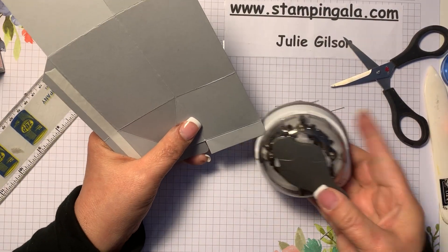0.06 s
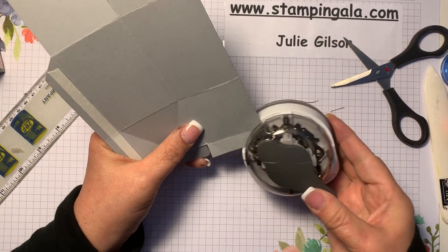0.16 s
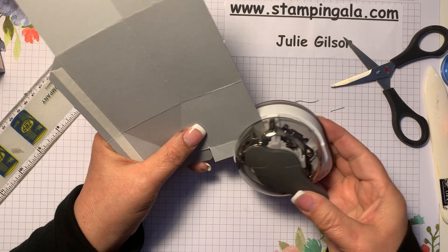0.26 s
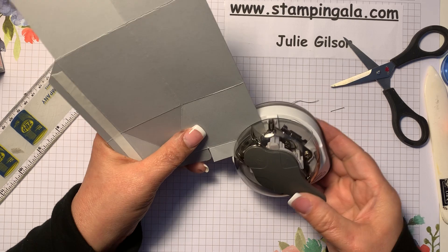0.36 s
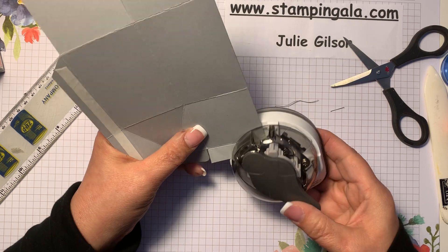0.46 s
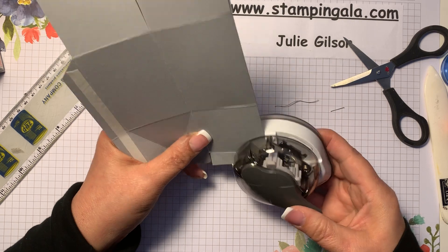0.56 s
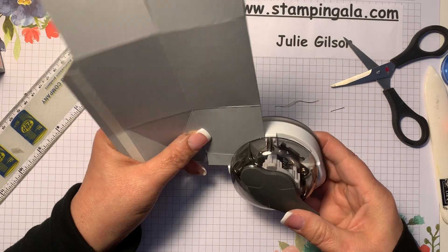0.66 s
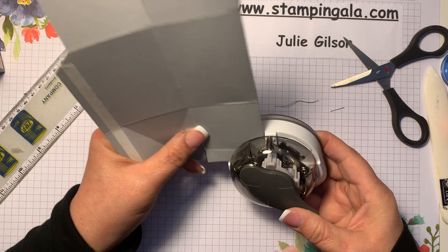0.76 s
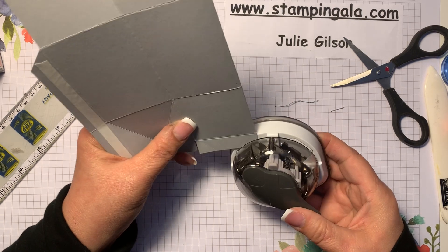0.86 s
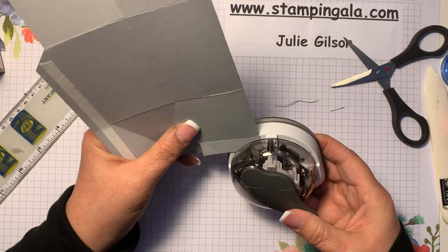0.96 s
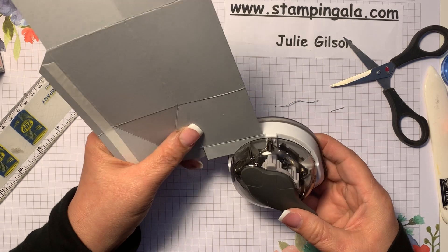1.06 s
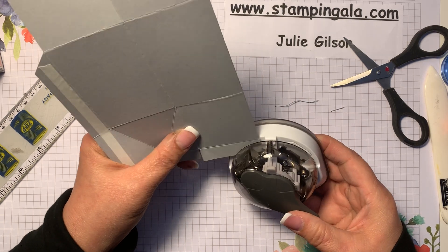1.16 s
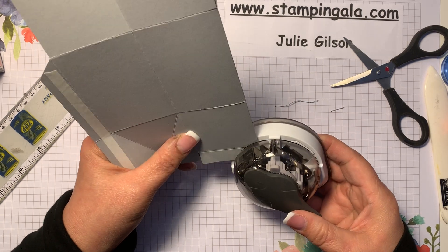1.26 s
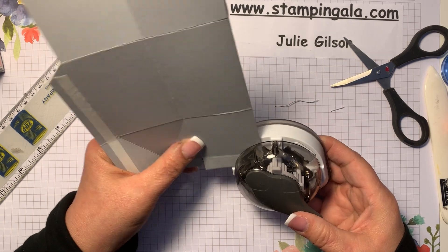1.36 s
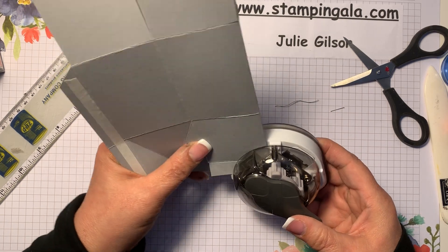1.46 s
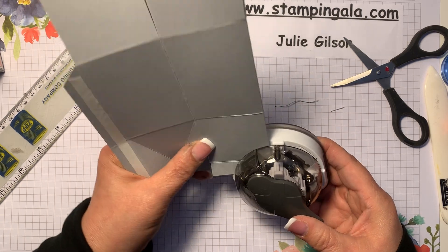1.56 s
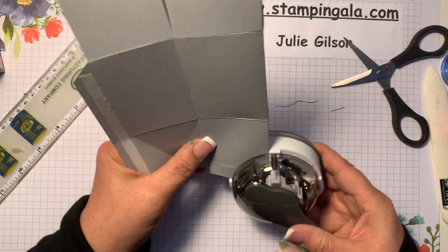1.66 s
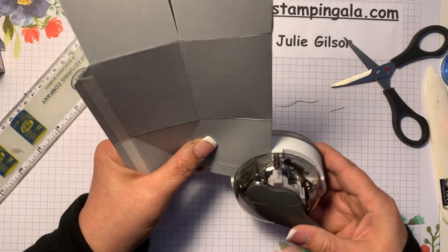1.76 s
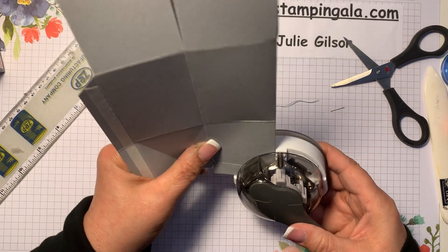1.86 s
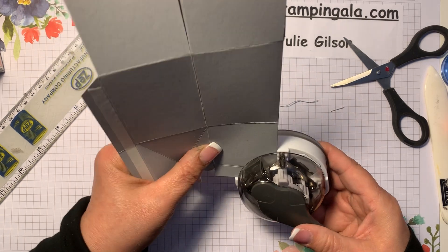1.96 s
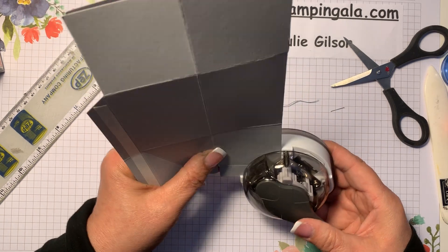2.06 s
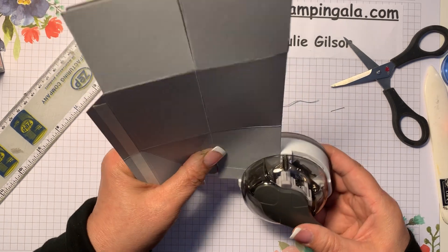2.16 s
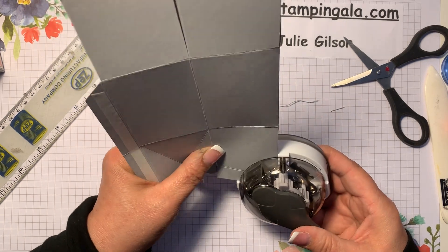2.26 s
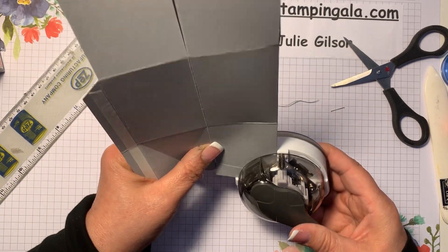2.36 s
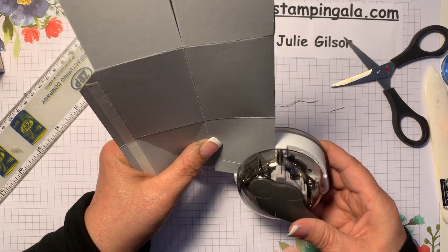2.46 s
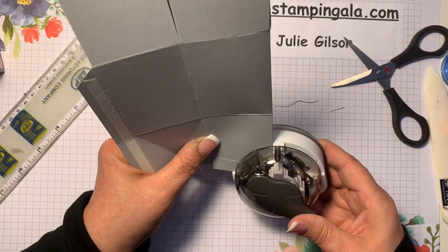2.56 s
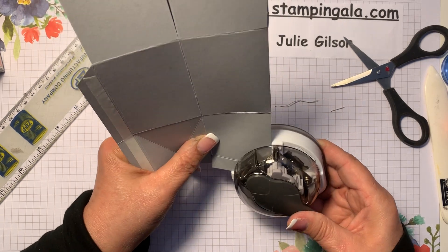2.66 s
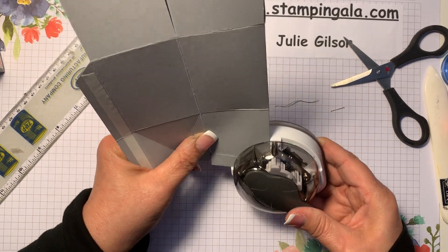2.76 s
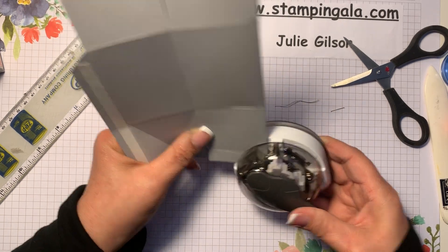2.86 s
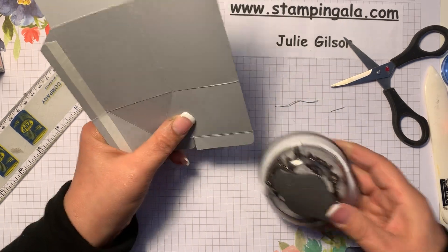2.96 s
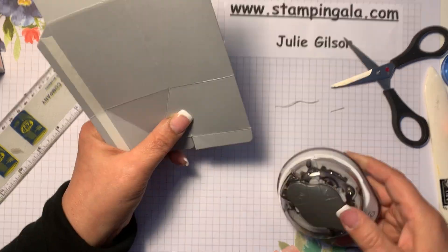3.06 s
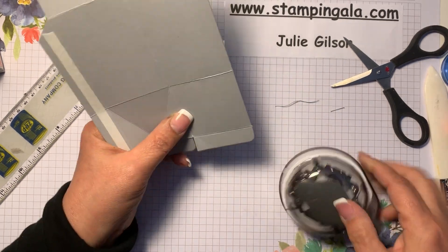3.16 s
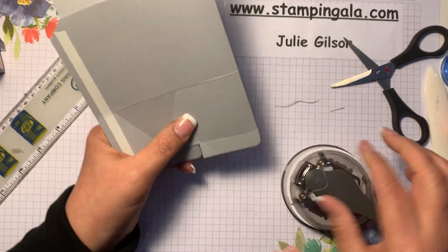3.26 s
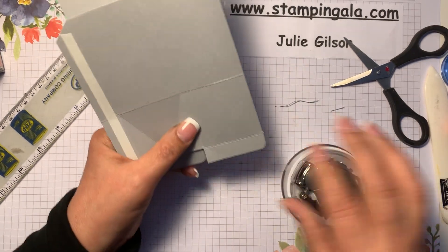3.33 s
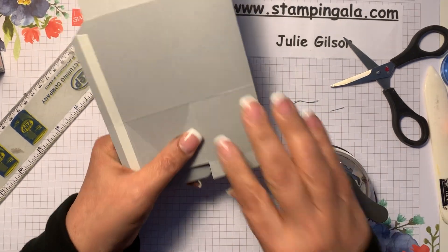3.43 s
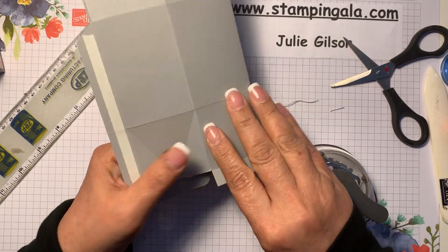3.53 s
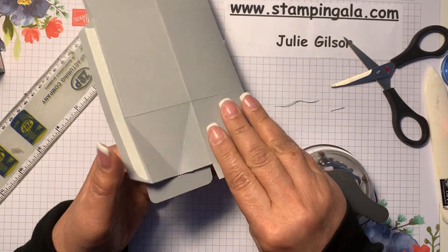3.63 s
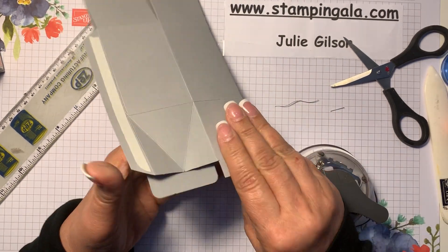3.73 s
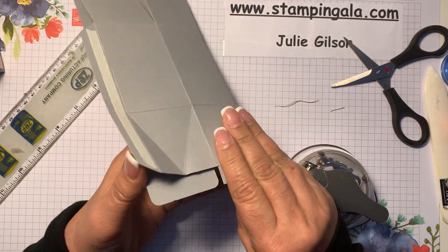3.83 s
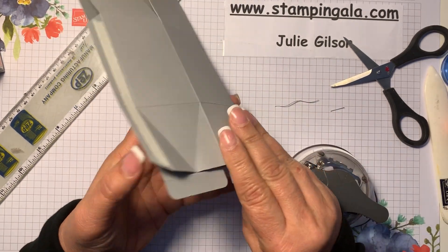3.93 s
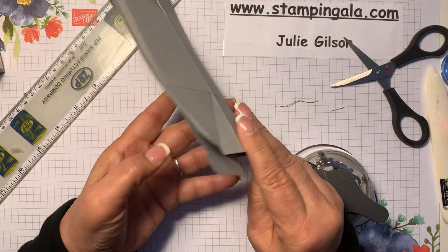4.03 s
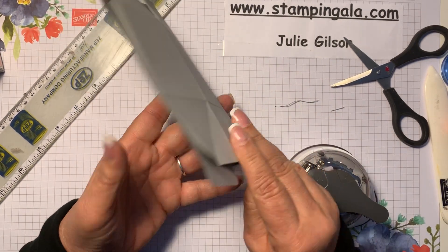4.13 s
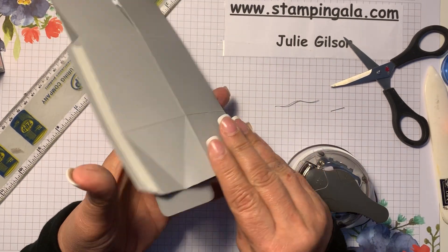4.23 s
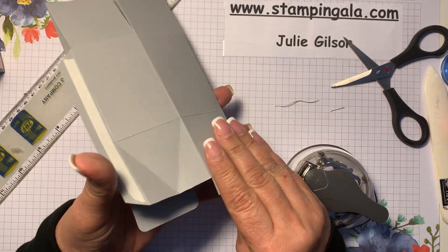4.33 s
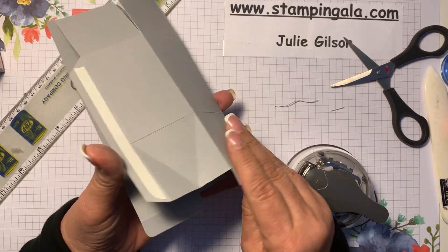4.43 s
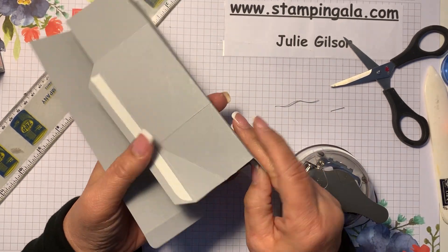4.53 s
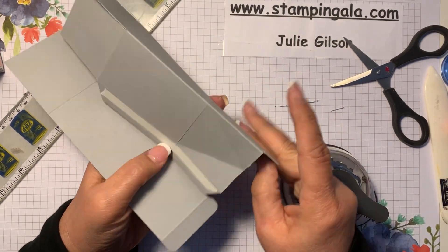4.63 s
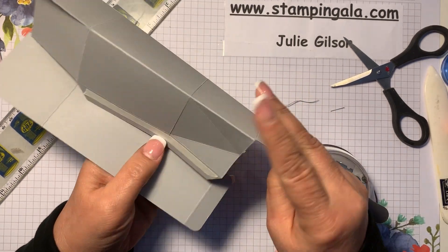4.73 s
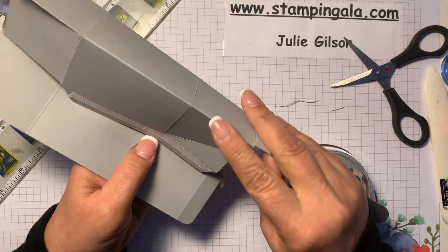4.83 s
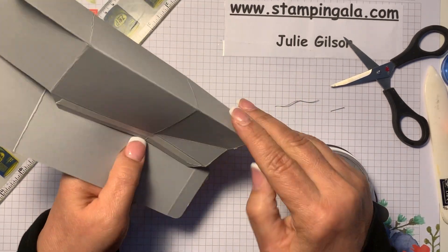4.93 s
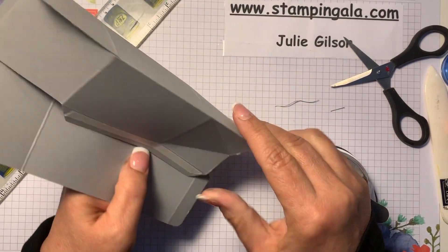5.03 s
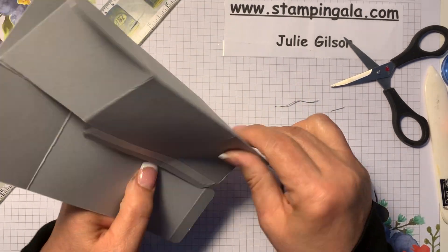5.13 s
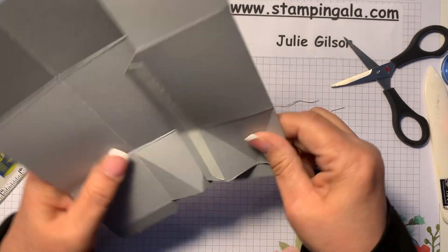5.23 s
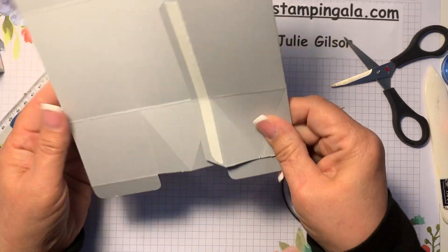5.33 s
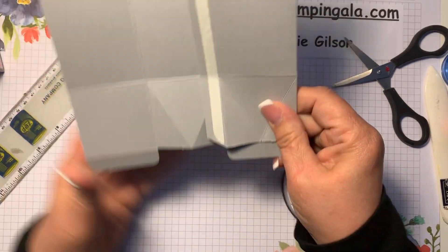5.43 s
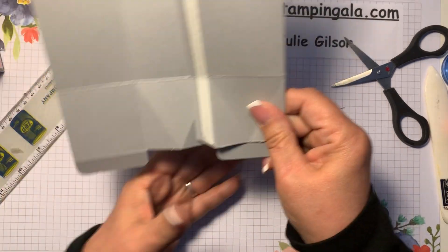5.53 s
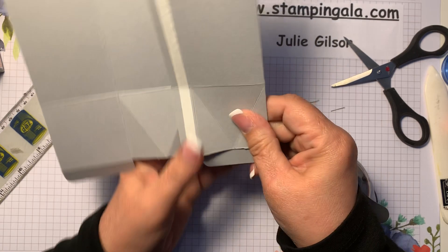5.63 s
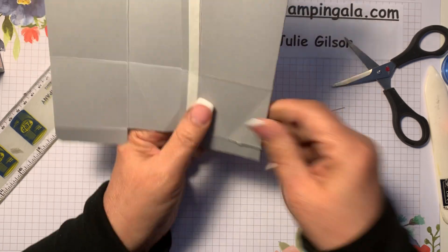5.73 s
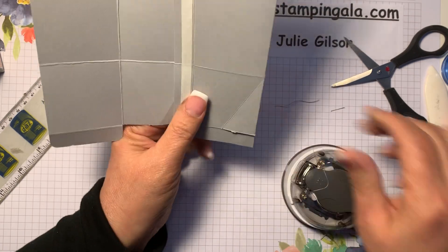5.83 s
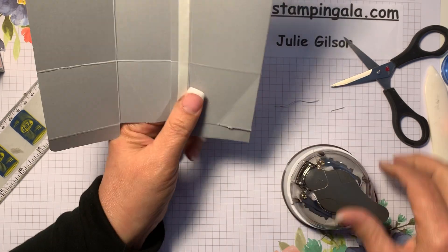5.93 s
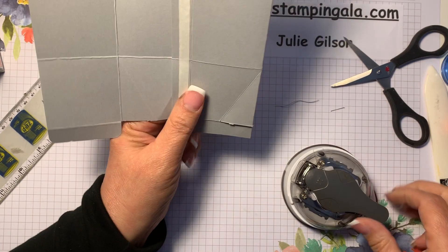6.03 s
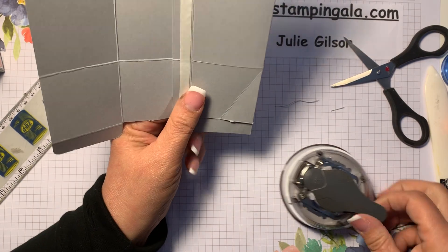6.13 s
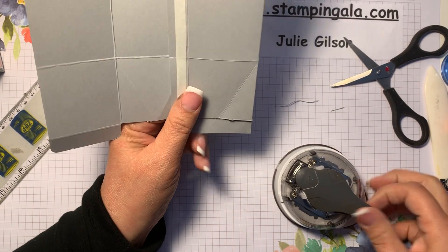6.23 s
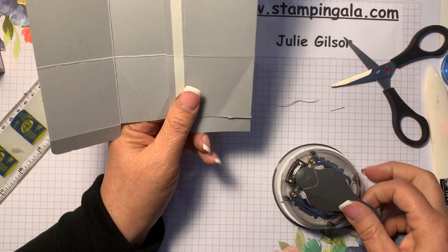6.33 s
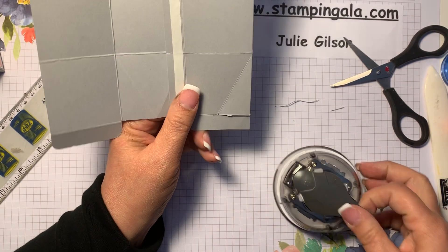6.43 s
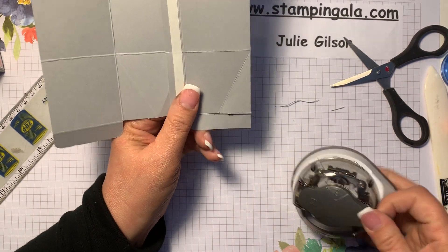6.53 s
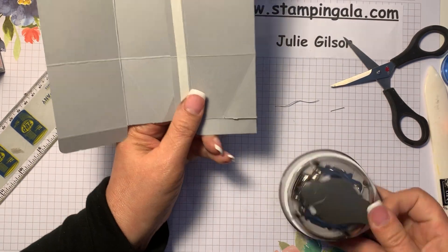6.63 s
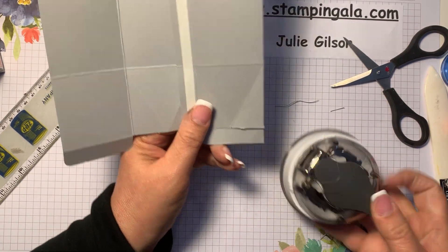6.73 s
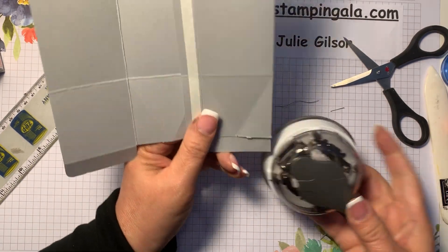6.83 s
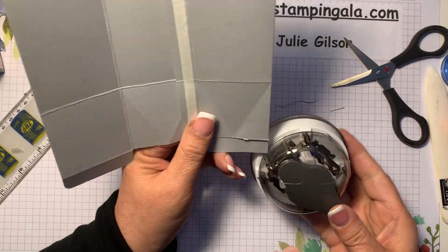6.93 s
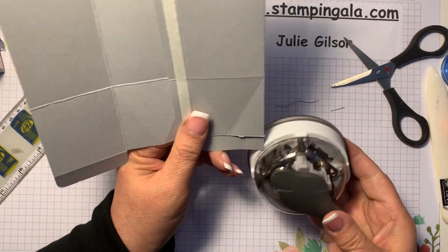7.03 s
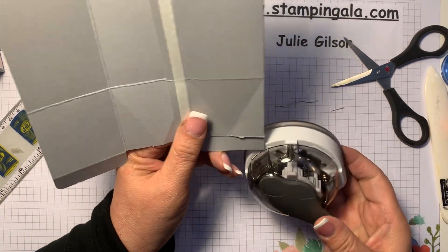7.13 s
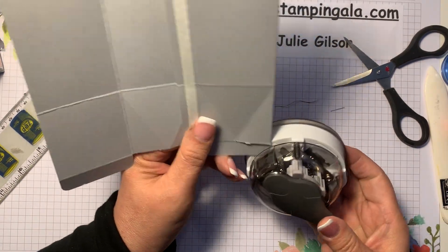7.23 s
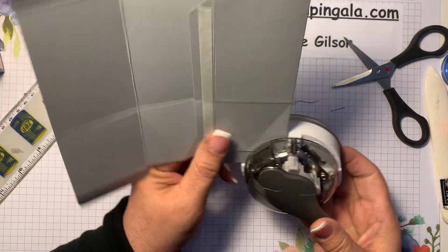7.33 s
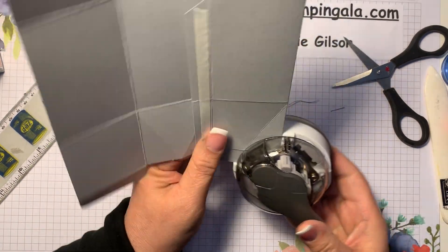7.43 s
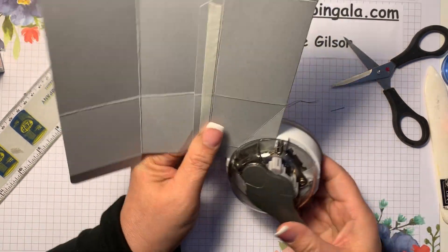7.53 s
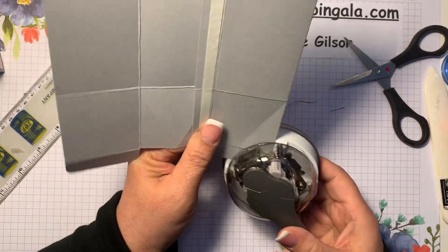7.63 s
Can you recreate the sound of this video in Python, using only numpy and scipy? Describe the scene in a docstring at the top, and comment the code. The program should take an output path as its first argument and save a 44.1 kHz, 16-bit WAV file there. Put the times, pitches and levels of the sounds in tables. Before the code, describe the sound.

A handheld punch clunks through cardstock and is set down, then the card rustles and taps on a table.

```python
"""A handheld corner punch snaps through cardstock, springs back and is set down on a craft table.
Its steel die cracks and rings, its plastic housing clacks and squeaks, and the table booms under it.
The card is turned over: it slides with a grainy hiss and a drone, flexes, and knocks as its edge taps.
Then the punch is picked up and fed the next corner. A small room with quiet air surrounds it all."""
import sys
import numpy as np
from scipy import signal
from scipy.fft import rfft, irfft, next_fast_len
from scipy.io import wavfile

SR = 44100
rng = np.random.default_rng(int(sys.argv[2]) if len(sys.argv) > 2 else 0)


def dump_mix(stems):
    """Bounce the given channels to the path in sys.argv[1] as a 16-bit WAV at rate SR."""
    frames = np.atleast_2d(stems).T  # one column per channel
    limited = np.clip(frames, -1, 1)  # hard clip at full scale
    pcm = np.round(limited * 32767).astype(np.int16)
    wavfile.write(sys.argv[1], SR, pcm)


N = 339129
TIME = np.arange(N) / SR
HIT = TIME[:SR // 7]  # time axis of one short impact

# Die and lever making contact. Each row: start in seconds, relative levels of steel, housing and crack
# in dB, then the struck part's ring time (t60) in seconds and its pitch in Hz.
CLACKS = [(2.6175, -46.5, -52, -59, 0.035, 2390), (2.641, -41.5, -52.5, -62, 0.019, 2100),
          (2.6529, -20.5, -41, -30, 0.032, 3350), (2.6598, -21.5, -33, -40, 0.029, 2110),
          (2.6826, -25.5, -35.5, -41, .04, 2638), (2.6863, -9, -21.5, -6.5, 0.013, 2990),
          (2.969, -18.5, -40.5, -24.5, .023, 3410), (2.9725, -13.5, -28.5, -34.5, .016, 3254),
          (3.098, -33.5, -33.5, -51, .05, 2130), (3.2601, -23.5, -29, -33.5, 0.051, 2596),
          (3.2685, -9, -23, -10, .016, 4610), (6.1652, -26.5, -39.5, -36.5, 0.012, 2064)]
# Low thumps: the punch landing, snapping or being bumped, and soft puffs of flexing card.
# Each row: start in seconds, relative level in dB, cut-off in Hz.
THUMPS = [(0.917, -39, 300), (1.013, -40, 400), (1.496, -43, 405), (1.964, -55, 646), (2.662, -50, 900),
          (2.687, -34, 910), (3.099, -12, 440), (3.129, -8.5, 131.7), (3.2617, -9.5, 824),
          (3.2707, -2, 669), (4.323, -35, 198), (5.74, -43, 286), (6.064, -39, 328), (6.167, -17.5, 306),
          (6.299, -31.5, 280), (6.448, -28.5, 255), (7.105, -40, 447.4), (7.394, -34, 450),
          (7.4208, -31.5, 560), (7.43, -43, 120)]
# Plastic and card edge sticking. Each row: start and length in seconds, pitch in Hz, level in dB.
SQUEAKS = [(1.38, 0.1, 3420, -56.5), (2.439, 0.0078, 2140, -62.5), (2.94, 0.027, 1526, -47),
           (3.194, 0.17, 2060, -56.5), (3.765, 0.04, 2250, -46), (6.18, 0.14, 1980, -60.5),
           (6.682, 0.043, 2208, -59.5), (6.7076, 0.023, 2150, -44.5)]
# Card edge and fingernails tapping. Each row: start in seconds, knock level in dB, knock pitch in Hz,
# relative tick level in dB.
TAPS = [(0.04, -95, 799, -37.5), (0.178, -45.5, 1490, -45), (0.194, -36, 1550, -50),
        (0.274, -34, 1148, -66), (0.616, -35, 1230, -54), (0.7, -31.5, 1460, -46.5),
        (1.014, -34.5, 1017, -78), (1.145, -50, 1090, -58), (1.466, -30.5, 1260, -67),
        (1.49, -34.5, 1500, -61), (1.681, -32.5, 1486, -46.5), (1.707, -36, 1023, -72),
        (1.963, -23, 1094, -58), (2.125, -47.5, 1010, -61), (3.555, -30.5, 919, -38.5),
        (3.589, -49, 1005, -37), (3.637, -43, 964, -35), (3.821, -35, 940, -46.5),
        (3.860, -35.5, 1020, -33.5), (3.866, -29, 1806, -26.5), (3.944, -37.5, 961, -46.5),
        (4.154, -54, 705, -46), (4.309, -36, 940, -56.5), (4.322, -30.5, 1312, -44),
        (4.344, -37.5, 1130, -43), (4.649, -27, 1540, -34), (4.7548, -13, 1400, -27.5),
        (4.922, -45, 1006, -43), (5.078, -33, 980, -43), (5.172, -33, 890, -48), (5.185, -26.5, 1528, -30),
        (5.261, -28, 1037, -31), (5.739, -31, 1015, -49), (5.922, -37.5, 1495, -55),
        (6.013, -47, 1110, -44.5), (6.158, -37.5, 842, -37.5), (6.278, -47, 980, -54),
        (6.339, -44.5, 1446, -29), (6.945, -51.5, 777, -55), (7.1005, -18.5, 1015, -30),
        (7.4193, -12, 939, -70), (7.429, -30.5, 1160, -62)]
# The card rubbing on punch, table or fingers. Each row: start and length in seconds, relative levels
# of drone and hiss in dB, swell across the stroke in dB.
STROKES = [(0.043, 0.092, -69.5, -73, 8), (0.219, .11, -54.5, -53.5, 4), (0.371, .14, -65, -66.5, 11),
           (0.542, 0.064, -57.5, -56.5, 17.5), (0.672, 0.079, -59, -59, -6),
           (0.802, 0.11, -60.5, -56.5, -4.5), (0.984, 0.12, -67, -67.5, -4), (1.195, 0.098, -71, -69, 9.5),
           (1.379, 0.12, -61, -55, 6), (1.51, 0.082, -72, -68, 9.5), (1.658, 0.098, -59, -69.5, 3),
           (1.919, 0.032, -60, -64, 14), (2.11, 0.043, -67.5, -74, -9), (2.891, 0.081, -55.5, -53.5, 25),
           (3.106, 0.17, -62.5, -60, 5), (3.413, 0.15, -65.5, -69.5, 1), (3.537, 0.13, -56, -55, 16),
           (3.746, 0.043, -47, -52, 3), (3.841, 0.023, -47, -47, 9), (3.879, 0.4, -66, -70, -1.5),
           (4.304, 0.047, -46.5, -59.5, -1), (4.377, 0.033, -59.5, -57, 9), (4.438, 0.092, -57, -57, 24),
           (4.574, 0.2, -52, -52, 14), (4.755, 0.22, -52, -58, 13), (5.01, 0.19, -57.5, -62.5, -1),
           (5.166, 0.1, -50, -46.5, -2), (5.251, 0.11, -51, -40.5, 4), (5.372, 0.034, -58, -56, -3),
           (5.404, 0.21, -65.5, -79, -15.5), (5.675, 0.11, -58, -55, 12), (5.915, 0.2, -65.5, -76, 8),
           (6.135, 0.12, -60.5, -58, 0.5), (6.281, 0.15, -62.5, -72.5, -0.5),
           (6.508, 0.1, -62.5, -62.5, 2.5), (6.646, 0.12, -64, -75.5, 0.5),
           (7.101, 0.062, -58, -62.5, -14.5), (7.244, 0.16, -65, -62.5, 29.5),
           (7.389, 0.055, -49, -63, -5.5), (7.498, 0.16, -64.5, -66.5, 20.5)]

# Resonances of the struck parts. Each row: pitch in Hz, relative level in dB, t60 in seconds.
STEEL_MODES = [(2230, -5, 0.017), (2360, -12, 0.0075), (3510, -12.5, 0.065), (3290, -6.5, 0.021),
               (4110, -6.5, 0.021), (4700, -18.5, 0.021)]
HOUSING_MODES = [(746, -9.5, .05), (1020, -11.5, 0.011), (1440, -7.5, .03), (1820, -12, 0.057)]
TABLE_MODES = [(29.7, -48, 0.79), (66.1, -40, 1.5), (87.8, -27.5, 0.2), (120.9, -25, 0.31),
               (143, -27.5, 0.5), (221.2, -15, 0.19), (273.5, -11.5, 0.13), (345, -51, 1.2),
               (343, -47, 1.9), (347.9, -4.5, 0.085), (475, -22, 0.13), (581, -8, 0.06),
               (708, -12.5, 0.084), (767, -6, .065), (924, -11, 0.053), (1029, -8.5, 0.17)]  # the table top with the punch on it

# Tone colours of the noise layers. Each row: frequency in Hz, relative level in dB.
RASP_COLOUR = [(1000, -19.5), (2000, 2.5), (3400, -3), (4800, -3), (6500, -10), (10000, -31.5)]  # hard surfaces scraping
TICK_COLOUR = [(3000, -29), (5500, -4.5), (8500, 5), (11000, 3.5), (15500, -4.5), (18000, -12.5)]  # the bright tip of an impact
HOUSING_COLOUR = [(100, -21.5), (300, -6.5), (700, 6.5), (1700, -6.5), (2400, -8), (5000, -44)]
TABLE_TOP_COLOUR = [(25, -22.5), (70, -7.5), (200, 14), (400, 6), (800, -21), (1300, -26.5), (3000, -48),
                    (8000, -67)]
TABLE_FRAME_COLOUR = [(20, -5), (45, 1), (85, -5), (170, -1.5), (350, -11), (700, -33), (2000, -66)]
FLEX_COLOUR = [(30, -17), (120, -11), (300, 4), (480, 0), (750, -9), (1500, -35.5)]  # the low flap of bending card
SHEET_COLOUR = [(50, -17), (200, -12.5), (450, -5.5), (680, -10), (1000, 0), (1250, -9.5), (1550, -4),
                (2200, -14), (3500, -16), (6000, -31), (12000, -49)]  # the body of the card
HISS_COLOUR = [(600, -24), (1800, -8.5), (2600, -10.5), (3600, 3.5), (5000, 1.5), (6500, -2), (8500, 3),
               (11000, 2), (13500, -1.5), (15500, -4.5), (18000, -14.5)]  # fibre friction
ROOM_COLOUR = [(50, 3.5), (200, -1.5), (700, -7), (1500, 2), (3000, 3.5), (8000, -4.5), (16000, 2)]
AIR_COLOUR = [(20, -4.5), (60, 3), (130, -8), (300, -11), (600, -20), (1000, -15), (1600, -20), (4000, -23),
              (9000, -26.5), (16000, -28.5)]

# Panning; the card is held to the left. Each row: frequency in Hz, left minus right in dB.
PUNCH_PAN = [(300, 0.75), (800, 3), (1600, -0.5), (3000, 1), (5000, -5), (8000, -0.5)]
CARD_PAN = [(150, 1), (500, 0.5), (1200, 6), (2500, 3), (6000, -0.5)]
# Stereo likeness, close up and in the room. Each row: frequency in Hz, likeness from 0 (wide) to 1 (mono).
NEAR_LIKENESS = [(200, 0.9), (600, 0.93), (1200, 0.3), (2200, 0.8), (3800, 0.1), (6000, 0.4), (8000, 0.98)]
ROOM_LIKENESS = [(150, 0.88), (500, 0.6), (1200, 0.35), (3500, 0.069), (6000, 0.3), (8000, 1)]
# Raised, the punch throws its sound into the room; lowered, the hand shields it.
# Each row: time in seconds, relative reverb send in dB.
PUNCH_SEND = [(2.66, -2.5), (2.69, 4.5), (2.96, -10), (3.1, -3), (3.27, -4.5), (6.2, -3.5)]
# The room's decay. Each row: frequency in Hz, t60 in seconds.
ROOM_T60 = [(100, 0.39), (350, 0.3), (700, 0.52), (1500, 0.16), (4000, 0.28), (8000, 0.27), (16000, 0.15)]


def punch_clacks(steel_db=-3, housing_db=8, crack_db=10, graze_db=-20.5, graze_s=.01):
    """Each contact grazes, cracks, and rings the struck part, the die and the plastic housing."""
    out = np.zeros((2, N))
    approach = decay(HIT[HIT < graze_s], t60=.038)[::-1]
    for start, steel_hit_db, housing_hit_db, crack_hit_db, t60, hz in CLACKS:
        part = ring([(hz, -4, t60)], HIT)
        steel = part + burst(RASP_COLOUR, t60, rise_s=.00024) + from_db(-8) * ring(STEEL_MODES, HIT)
        housing = burst(HOUSING_COLOUR, 1.4 * t60, rise_s=.00077)
        housing += from_db(-3) * ring(HOUSING_MODES, HIT)
        crack = burst(TICK_COLOUR, .47 * t60, rise_s=.00017)
        graze = approach * noise(RASP_COLOUR, len(HIT))[:, :len(approach)]
        add(out, start, from_db(steel_hit_db + steel_db) * steel)
        add(out, start, from_db(housing_hit_db + housing_db) * housing)
        add(out, start, from_db(crack_hit_db + crack_db) * crack)
        add(out, start - graze_s, from_db(steel_hit_db + steel_db + graze_db) * graze)
    return out


def low_thumps(settle_s=.02, settle_db=-12, settle_hz=150):
    """Each thump booms with the table's resonances, then settles with a duller bump."""
    out, t = np.zeros((2, N)), TIME[:SR + SR // 4]
    table_ring = ring(TABLE_MODES, t, spread_db=1)
    settling = ring(TABLE_MODES, t, spread_db=1)
    shudder = noise(TABLE_FRAME_COLOUR, len(t)) * decay(t, t60=1)
    for start, level_db, cutoff_hz in THUMPS:
        shudder_db = -29 + .56 * level_db  # heavier blows shake the frame more
        boom = from_db(1) * table_ring + from_db(shudder_db) * shudder
        boom[:, :len(HIT)] += from_db(-12) * burst(TABLE_TOP_COLOUR, t60=.09, rise_s=.00095)
        add(out, start, from_db(level_db) * soften(boom, cutoff_hz))
        add(out, start + settle_s, from_db(level_db + settle_db) * soften(settling, settle_hz))
    return out


def plastic_squeaks(skirt_ratio=1.136):
    """Plastic sticks and slips in a narrow, rough band."""
    out = np.zeros((2, N))
    for start, length, hz, db in SQUEAKS:
        band = [(hz / 3, -40), (hz / skirt_ratio, -14), (hz, 0), (hz * skirt_ratio, -10), (hz * 4, -46)]
        size = int(length * SR)
        squeak = noise(band, 2 * len(HIT))[:, :size]
        add(out, start, from_db(db) * squeak * signal.windows.tukey(size, .3))
    return out


def card_taps(taps, sheet_db=-7, brush_db=-17, ring_cycles=21.5, knock_rise_s=.00046):
    """The edge brushes, then ticks down; the sheet flexes and knocks at a pitch set by the grip."""
    out = np.zeros((2, N))
    approach = decay(HIT[:SR // 30], t60=.02)[::-1]
    for start, knock_db, hz, tick_db in taps:
        # Flex grows more slowly than the knock; a tighter grip knocks higher and flexes less.
        flex_db = -23 + .79 * knock_db - 12.5 * np.log2(hz / 1000)
        rasp_db = knock_db - 2 + .52 * (tick_db - knock_db)  # follows both knock and tick
        panel = ring([(hz, 0, ring_cycles / hz)], HIT) * (1 - np.exp(-HIT / knock_rise_s))
        knock = panel + from_db(sheet_db) * burst(SHEET_COLOUR, t60=.027, rise_s=.0029)
        flex = from_db(flex_db) * burst(FLEX_COLOUR, t60=.077, rise_s=.00016)
        rasp = from_db(rasp_db) * burst(RASP_COLOUR, t60=.029, rise_s=.0015)
        tick = from_db(tick_db + 7) * burst(TICK_COLOUR, t60=.0081, rise_s=.00026)
        add(out, start, from_db(knock_db) * knock + flex + rasp + tick)
        brush = from_db(knock_db + sheet_db) * noise(SHEET_COLOUR, len(approach))
        brush += from_db(rasp_db) * noise(HISS_COLOUR, len(approach))
        add(out, start - len(approach) / SR, from_db(brush_db) * approach * brush)
    return out


def card_slides(drone_db=-1, panel_db=-6, scratch_db=-2, scuff_db=-11.5, lifted_s=(3.4, 5.9)):
    """Fibres catch and let go: a grainy hiss over a drone whose resonances shift as the sheet bends."""
    drone_gain, hiss_gain = stroke_envelopes()
    catches = from_db(2.5 * flutter(per_s=120))
    grains = from_db(1.5 * flutter(per_s=2300))
    shapes = np.array([from_db(8 * flutter(per_s=9)) for _ in range(2)])
    shapes /= np.linalg.norm(shapes, axis=0)  # the sheet drifts between two bent shapes
    sheet = sum(share * noise(SHEET_COLOUR, N, ripple_db=5, ripple_hz=121.2) for share in shapes)
    hiss = sum(share * noise(HISS_COLOUR, N, ripple_db=5, ripple_hz=288.8) for share in shapes)
    rasp = sum(share * noise(RASP_COLOUR, N, ripple_db=7, ripple_hz=216) for share in shapes)
    # Unless it is lifted in the fingers, the card scratches and flexes against the hard punch.
    on_punch = (TIME < lifted_s[0]) | (TIME > lifted_s[1])
    scratch = on_punch * from_db(scratch_db) * rasp
    scuff = on_punch * from_db(scuff_db) * noise(FLEX_COLOUR, N)
    drone = from_db(drone_db) * drone_gain * (sheet + scuff + from_db(panel_db) * panel_song())
    friction = hiss_gain * grains * (hiss + scratch)
    return catches * (drone + friction)


def stroke_envelopes(attack_s=.014, release_t60=.11, arch_db=1.5):
    """Gains of drone and hiss: each stroke sets in, swells or fades with the pressure, then dies."""
    out, t = np.zeros((2, N)), TIME[:SR // 2]
    attack = np.minimum(t / attack_s, 1)
    for start, length, drone_db, hiss_db, swell_db in STROKES:
        travel = np.minimum(t / length, 1)
        speed_db = arch_db * (np.sin(np.pi * travel) - 2 / np.pi)  # the hand is fastest mid-stroke
        hold = from_db(swell_db * (travel - .5) + speed_db)
        release = decay(np.maximum(t - length, 0), release_t60)
        add(out, start, from_db([[drone_db], [hiss_db]]) * attack * hold * release)
    return out


def panel_song(width_hz=130):
    """Rubbing excites the card's knock resonance, which glides as the grip changes from tap to tap."""
    starts, _, hz, _ = np.transpose(TAPS)
    pitch_hz = np.interp(TIME, starts, hz)
    carrier = np.exp(2j * np.pi * np.cumsum(pitch_hz) / SR)
    narrow = signal.butter(2, width_hz, fs=SR, output="sos")
    real, imaginary = signal.sosfilt(narrow, rng.standard_normal((2, N)))
    return rms_one(real * carrier.real + imaginary * carrier.imag)


def edge_snags(per_s=5.9, tries=4, low_hz=910, high_hz=1570, knock_db=8.5, tick_db=1, spread_db=1.5):
    """Rows of small chance taps where the edge snags, following the strength of the stroke."""
    taps = []
    for start, length, drone_db, hiss_db, swell_db in STROKES:
        for chance, where, grip, force in rng.random((tries, 4)):
            if chance < per_s * length / tries:
                db = swell_db * (where - .5) + spread_db * (2 * force - 1)
                hz = low_hz + grip * (high_hz - low_hz)
                taps.append((start + where * length, drone_db + knock_db + db, hz, hiss_db + tick_db + db))
    return taps


def table_bounce(x, share=.42, delay_s=.000872, sway=.35):
    """The table top reflects the card; the path changes as the card moves and sweeps its colour."""
    height = np.exp(sway * flutter(per_s=5))
    delays = delay_s * height * np.array([[1], [1.25]])
    echo = np.array([np.interp(TIME - delay, TIME, side) for delay, side in zip(delays, x)])
    treble = signal.butter(2, 6000, "high", fs=SR, output="sos")
    left_excess = echo[0] - echo[1] + 1e-12 * rng.standard_normal(N)
    echo[1] += signal.sosfiltfilt(treble, left_excess)  # both sides get the same treble
    return (x + share * echo) / np.hypot(1, share)


def room(x, build_s=.013):
    """Diffuse reflections start faint, step up after a moment, and die at each band's own rate."""
    t = TIME[:SR]
    diffuse = rfft(noise(ROOM_COLOUR, SR, ROOM_LIKENESS))
    log_hz = np.log(np.arange(SR // 2 + 1) + 1)
    centres, tail = np.log([hz for hz, _ in ROOM_T60]), 0
    for share, (_, t60) in zip(np.eye(len(centres)), ROOM_T60):
        band = np.interp(log_hz, centres, share)
        tail += irfft(diffuse * band, SR) * decay(t, t60)
    tail *= np.where(t > build_s, 1, .25)
    return signal.fftconvolve(x, rms_one(tail) / np.sqrt(SR), axes=1)[:, :N]


def room_air(level_db=-72):
    """A steady bed of faint rumble and hiss."""
    return from_db(level_db) * noise(AIR_COLOUR, N, ROOM_LIKENESS)


def ring(modes, t, spread_db=1.5, rise_s=.000093):
    """Decaying sines, each struck with a strength and phase of its own."""
    out = np.zeros(len(t))
    for hz, db, t60 in modes:
        gain = from_db(db + spread_db * rng.normal())
        out += gain * np.sin(2 * np.pi * (hz * t + rng.random())) * decay(t, t60)
    return out * (1 - np.exp(-t / rise_s))


def burst(colour, t60, rise_s):
    """Many close modes struck together: noise that swells (rise held to 0.4 ms or more) and dies."""
    swell = (1 - np.exp(-HIT / max(rise_s, .0004))) ** 2
    return noise(colour, len(HIT), ripple_db=2.5) * decay(HIT, t60) * swell


def noise(colour, size, likeness=NEAR_LIKENESS, ripple_db=0, ripple_hz=260):
    """Coloured stereo noise of rms 1; ripple adds the chance peaks and dips of a struck part."""
    n = next_fast_len(size)
    hz = np.arange(n // 2 + 1) * SR / n
    mid, side = rfft(rng.standard_normal((2, n)))
    peaks = rng.standard_normal(size=200)
    level_db = at_hz(colour, hz) + ripple_db * np.interp(hz / ripple_hz, np.arange(len(peaks)), peaks)
    alike = at_hz(likeness, hz)
    pair = np.sqrt(1 + alike) * mid + np.sqrt(1 - alike) * side * [[1], [-1]]
    return rms_one(irfft(pair * from_db(level_db), n)[:, :size])


def soften(x, cutoff_hz):
    """A soft contact leaves out the upper modes."""
    return signal.sosfilt(signal.butter(3, cutoff_hz, fs=SR, output="sos"), x)


def place(x, pan, lead_s=0):
    """Pan a source band by band; a lead brings its lows and mids to the left side first."""
    n = next_fast_len(N + SR // 10)
    hz = np.arange(n // 2 + 1) * SR / n
    lead_turns = lead_s * hz * np.interp(hz, [2500, 4500], [1, 0])
    half = np.array([[.5], [-.5]])
    panned = rfft(x, n) * from_db(at_hz(pan, hz) * half)
    return irfft(panned * np.exp(2j * np.pi * lead_turns * half), n)[:, :N]


def flutter(per_s):
    """Random wander, gliding to a new value per_s times a second."""
    knots = rng.standard_normal(N // 10)
    return np.interp(TIME * per_s, np.arange(len(knots)), knots)


def decay(t, t60):
    """Fall by 60 dB in t60 seconds."""
    return np.exp(-np.log(1000) * t / t60)


def add(out, start_s, sound):
    """Mix a sound in at its cue."""
    i = int(np.clip(round(start_s * SR), 0, N - 1))
    out[:, i:i + sound.shape[-1]] += sound[..., :N - i]


def at_hz(points, hz):
    """Read a table on a log-frequency axis."""
    table_hz, value = np.transpose(points)
    return np.interp(np.log(np.maximum(hz, 1)), np.log(table_hz), value)


def from_db(db):
    """Decibels to gain."""
    return 10 ** (np.asarray(db) / 20)


def rms_one(x):
    """Scale to unit rms."""
    return x / np.sqrt(np.mean(x ** 2) + 1e-20)


def scene(room_db=-13.5, thump_send_db=-3, card_send_db=-9.5):
    """Punch and card up close, with the room and its quiet air behind them."""
    clacks, thumps = punch_clacks(), low_thumps()
    punch = place(clacks + thumps + plastic_squeaks(), PUNCH_PAN)
    handling = card_taps(TAPS) + table_bounce(card_slides()) + card_taps(edge_snags())
    card = place(handling, CARD_PAN, lead_s=.0001)
    clack_send = from_db(np.interp(TIME, *np.transpose(PUNCH_SEND))) / np.sqrt(2)
    room_feed = clack_send * clacks + from_db(thump_send_db) * thumps + from_db(card_send_db) * card
    # Two independent sets of reflections blend into a smooth room tail.
    reflections_a = room(room_feed)
    reflections_b = room(clack_send * punch_clacks())
    return punch + card + from_db(room_db) * (reflections_a + reflections_b) + room_air()


def record(dry, treble_lag_s=.000254, peak_limit=.9, cutoff_hz=16300):
    """The left channel's treble lags slightly; peaks are rounded and the top is cut."""
    n = next_fast_len(N + SR // 10)
    hz = np.arange(n // 2 + 1) * SR / n
    lag_turns = np.maximum(hz * treble_lag_s - 1, 0)
    left = irfft(rfft(dry[0], n) * np.exp(-2j * np.pi * lag_turns), n)[:N]
    rounded = peak_limit * np.tanh(np.array([left, dry[1]]) / peak_limit)
    return signal.sosfilt(signal.ellip(10, .2, 80, cutoff_hz, fs=SR, output="sos"), rounded)


dry = scene()
out = record(dry)
dump_mix(out)
```